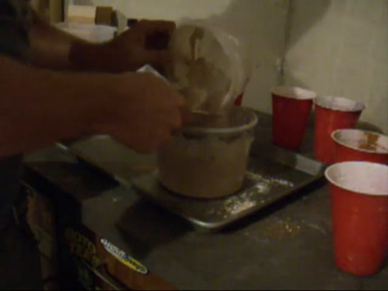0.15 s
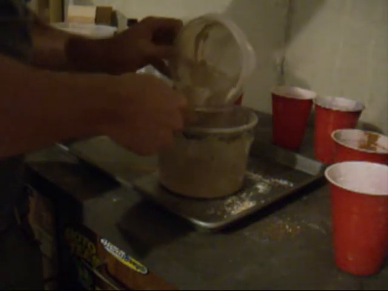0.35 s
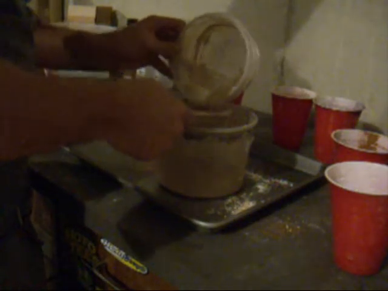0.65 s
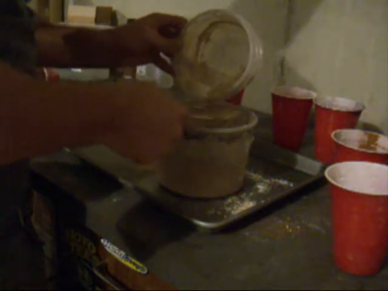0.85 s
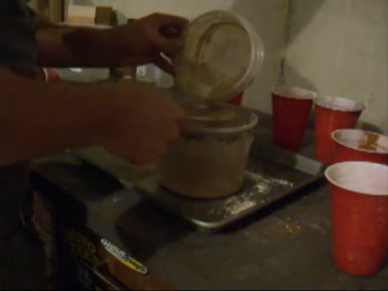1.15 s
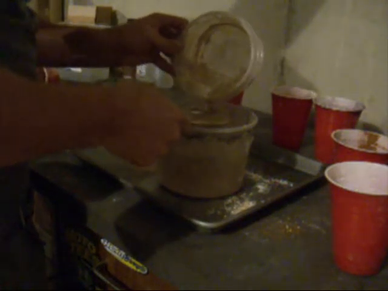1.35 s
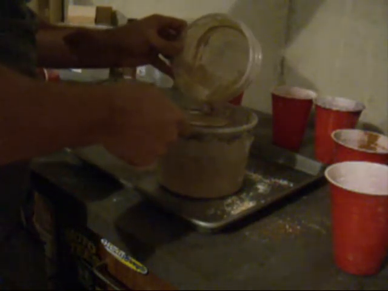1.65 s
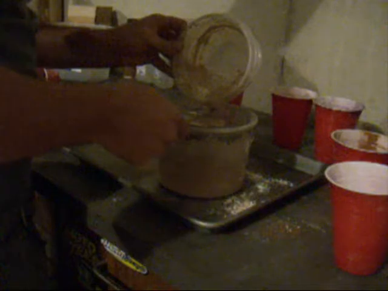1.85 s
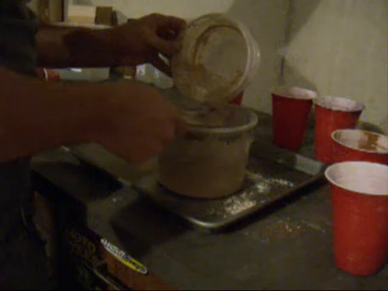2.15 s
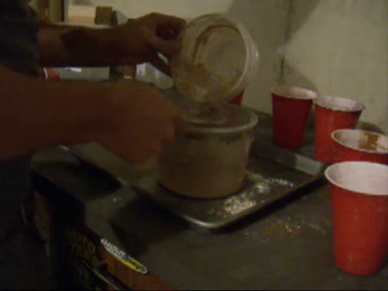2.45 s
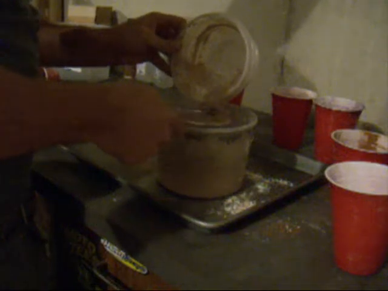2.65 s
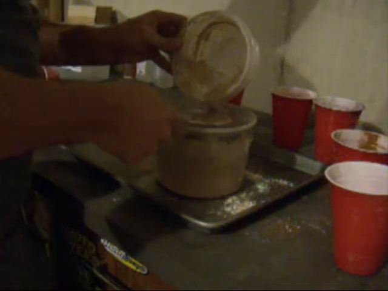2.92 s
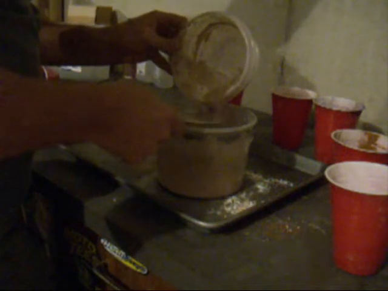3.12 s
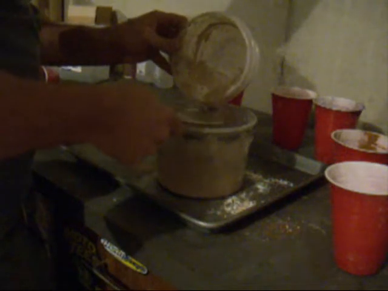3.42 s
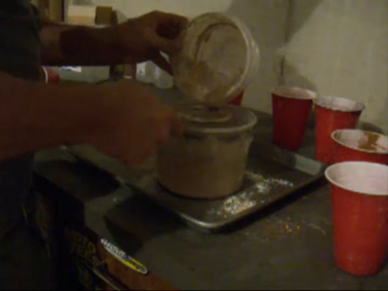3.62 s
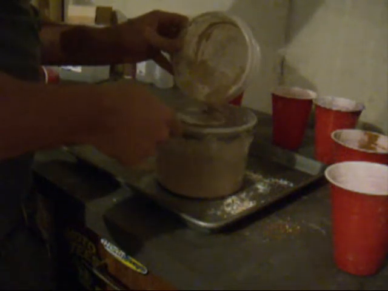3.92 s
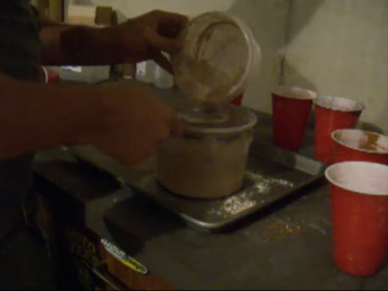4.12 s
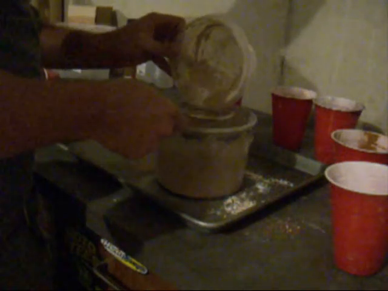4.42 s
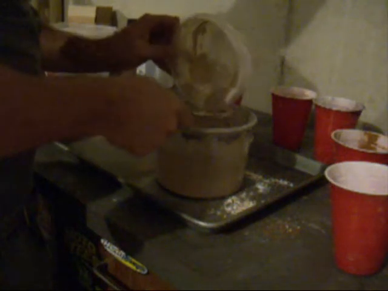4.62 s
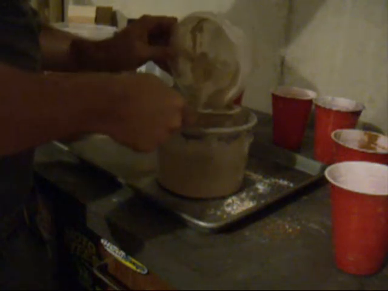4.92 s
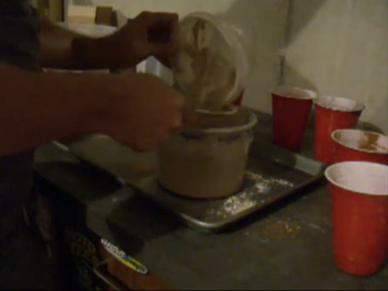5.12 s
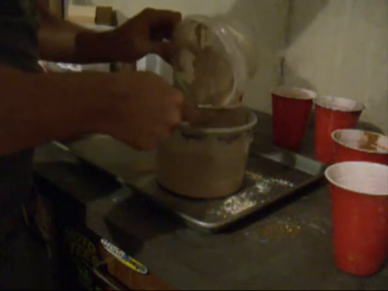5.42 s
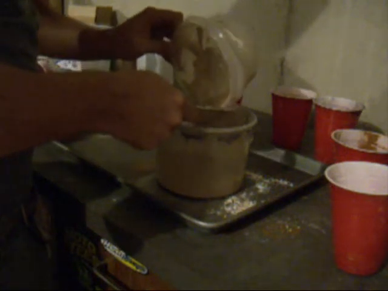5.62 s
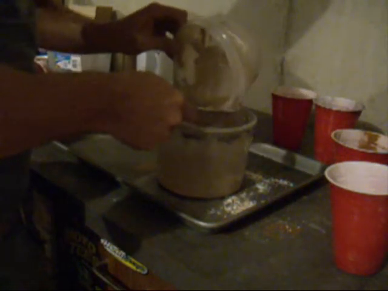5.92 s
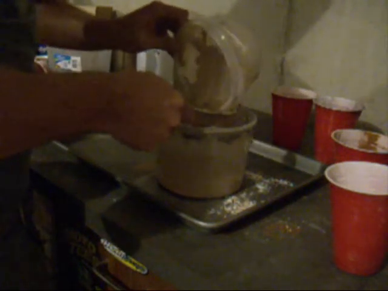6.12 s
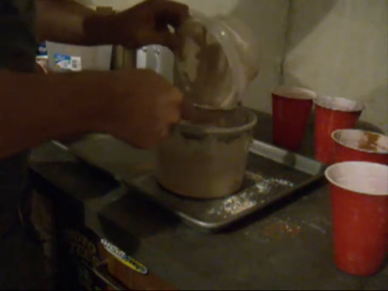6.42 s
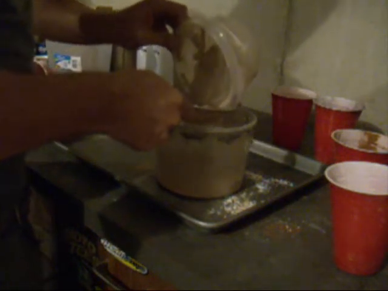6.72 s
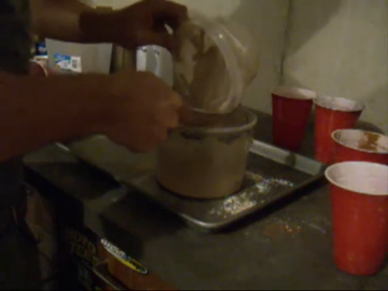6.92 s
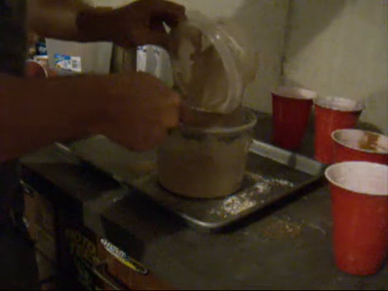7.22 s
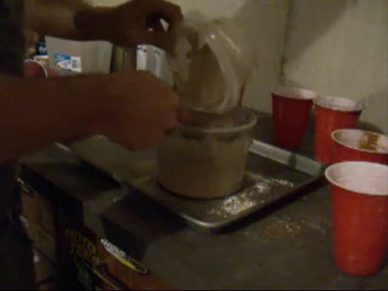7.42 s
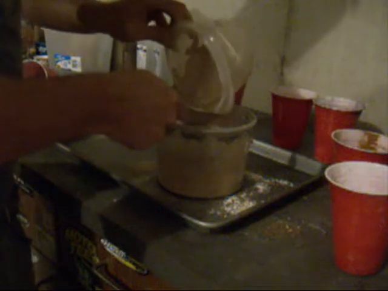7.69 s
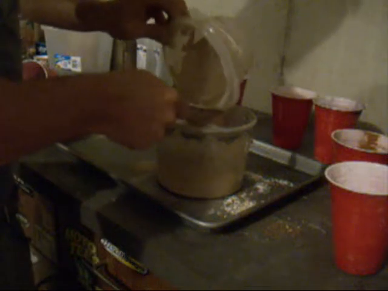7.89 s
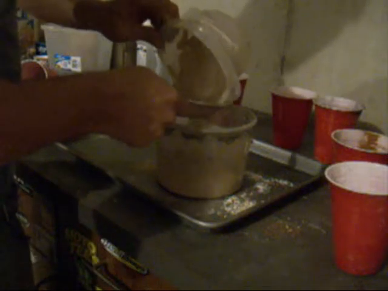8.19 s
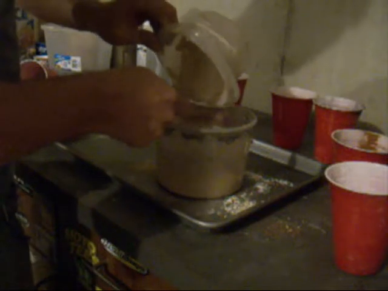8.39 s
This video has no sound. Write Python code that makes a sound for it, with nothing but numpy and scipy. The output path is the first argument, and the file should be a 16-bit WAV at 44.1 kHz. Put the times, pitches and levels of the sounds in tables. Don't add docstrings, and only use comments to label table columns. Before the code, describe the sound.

A small, close microphone in a bare, hard-walled room gives steady low rumble, soft hiss and two barely audible high whistles. From 0 to 0.5 s, a few faint strainer knocks and ticks come with a light powder swish, then quiet. At 1.7 s dull, soft pats on a plastic tub begin; from 2.1 s harder rim taps join, hollow, dry and short. The strongest cluster falls at 2.65-2.95 s, with more sharp taps at 3.35 and 3.5 s. Softer pats continue to 4.0 s, while a thin airy dust hiss swells around 3.65 s and fades. From 4.5 s light wire ticks and gritty swishes return, with a longer rasp near 5.6 s. Frame knocks gather from 6.4 s, stronger at 7.3 and 7.7 s, loudest at 8.1 s amid thick sandy rasping, with further knocks at 8.3 and 8.45 s before the end at about 8.6 s.

```python
import sys
import numpy as np
from scipy import signal
from scipy.fft import rfft, irfft, next_fast_len
from scipy.io import wavfile

SR = 44100
rng = np.random.default_rng(int(sys.argv[2]) if len(sys.argv) > 2 else 0)


def voltage_ratio(decibels):
    exponent = np.asarray(decibels, float) / 20
    return 10 ** exponent


def store_wav(level_fs):
    pcm = np.round(np.clip(np.atleast_2d(level_fs), -1, 1) * 32767)
    wavfile.write(sys.argv[1], SR, pcm.T.astype(np.int16))


N = 377055

# (frequency [Hz], decay time t60 [s])
ROOM_T60 = [(100, 0.82), (300, 0.64), (600, 0.47), (1500, 0.52), (4000, 0.52), (10000, 0.21)]


def tub_blow_levels(rows, hollow_db, clack_db):
    s, body, rim, sharp = np.transpose(rows)
    knock, tick = body + rim, body + sharp
    snap = tick - 3.5
    return np.transpose([s, body, body + hollow_db, knock, knock + clack_db, tick, snap])


def tap_blows():
    # (time [s], strength [dB], rim over body [dB], sharpness [dB])
    taps = [
        (2.094, -39.5, -4, -32),
        (2.655, -28, -4, -18.5),
        (2.79, -27, -2.5, -17),
        (2.8159, -34, -19, -18),
        (2.933, -29, -3.5, -24.5),
        (3.224, -44, 2.5, -18),
        (3.354, -30.5, 0, -16),
        (3.496, -28, -5.5, -25),
    ]
    return tub_blow_levels(taps, hollow_db=-7, clack_db=-3.5)


def pat_blows():
    # (time [s], strength [dB], rim over body [dB], sharpness [dB])
    pats = [(1.678, -39, -14.5, -25), (1.8, -37.5, -18, -31), (2.046, -34.5, -7.5, -30),
            (2.337, -33, -11, -26.5), (2.493, -36, -6, -24), (2.758, -37, -6, -23),
            (3.0495, -32, -14.5, -27), (3.217, -38, -22, -27), (3.333, -31, -15, -27),
            (3.603, -29.5, -6, -23), (3.769, -38, -20, -31), (3.89, -33.5, -12, -29),
            (4.016, -29.5, -5.5, -27)]
    return tub_blow_levels(pats, hollow_db=0, clack_db=-3)


def shake_blows():
    # (time [s], strength [dB], rim over body [dB], wire over body [dB])
    frame_knocks = [(0.041, -40, -12, -8.5), (0.1831, -47.5, -6.5, 3.5), (0.3076, -46.5, -12, -9),
                    (0.459, -42.5, -10.5, -3.5), (4.743, -49, 3, 5.5), (5.876, -48.5, -7, 0.5),
                    (6.228, -54.5, -11, 8), (6.435, -35, -5.5, -3.5), (6.82, -49.5, -23, 1.5),
                    (6.935, -50.5, -5, 6), (7.316, -34.5, -9, -3.5), (7.386, -43, -2, -7),
                    (7.51, -41.5, -1, -11), (7.693, -31.5, -10, -12), (7.73, -45, -3, -28),
                    (7.839, -45, 1.5, -3.5), (7.888, -44.5, 3.5, -2.5), (7.926, -45.5, 2, 0.5),
                    (8.013, -46.5, 0, -6), (8.1015, -26.5, -7, -6.5), (8.225, -38.5, -2.5, -9.5),
                    (8.3145, -35.5, 0, -13.5), (8.453, -31.5, -7.5, -15.5), (8.523, -44, -14, -14)]
    # (time [s], strength [dB], sharpness [dB])
    wire_ticks = [(0.024, -55, 2), (0.108, -49, -19), (0.47, -41.5, -27), (4.511, -61, -1),
                  (4.576, -49, -11), (5.019, -56, -4), (5.061, -71, 7), (5.096, -64, -4),
                  (5.3866, -48.5, -9), (5.5101, -44.5, -10), (5.532, -70, -1), (5.574, -54, -3),
                  (5.699, -55.5, -4), (5.751, -56, -2), (5.918, -53, -4), (6.021, -58, 0),
                  (6.056, -45, -15), (6.129, -52.5, -11), (6.395, -49, -10), (6.571, -44, -14),
                  (6.606, -57, -5), (6.707, -44.5, -11.5), (6.791, -70, 11), (6.842, -52, -9),
                  (6.974, -51, -6), (7.046, -50, -7), (7.073, -70.5, 18.5), (7.113, -77, 4),
                  (7.247, -52, -17), (7.673, -54.5, 1)]
    s, body, rim, wire = np.transpose(frame_knocks)
    clack = body + wire
    knocks = [s, body, body + rim / 2 - 0.5, body + rim, clack, clack - 8, clack - 16]
    s, clack, sharp = np.transpose(wire_ticks)
    tick = clack + sharp
    ticks = [s, clack - 11.5, clack - 16.5, clack - 16.5, clack, tick, tick - 3.5]
    return np.hstack([knocks, ticks]).T


def click_train(blows, hz, extra_db):
    blow_hz = [450, 760, 1300, 2800, 5600, 11000]
    weights = [np.interp(np.log(hz), np.log(blow_hz), unit) for unit in np.eye(len(blow_hz))]
    clicks = np.zeros(N)
    at = np.round((blows[:, 0] + 0.0008) * SR).astype(int)
    clicks[at] = voltage_ratio(blows[:, 1:] @ weights + extra_db)
    return clicks


def ring(clicks, hz, t60):
    r = voltage_ratio(-60 / (t60 * SR))
    w = 2 * np.pi * hz / SR
    return signal.lfilter([0, np.sin(w)], [1, -2 * r * np.cos(w), r * r], clicks + 1e-18)


def fading(clicks, t60):
    return signal.lfilter([1], [1, -voltage_ratio(-60 / (t60 * SR))], clicks + 1e-18)


def struck(blows, modes, gain_db, scatter_db):
    spot = rng.standard_normal((len(blows), len(modes)))
    out = np.zeros(N)
    for k, (hz, db, t60) in enumerate(modes):
        clicks = click_train(blows, hz, db + gain_db + scatter_db * spot[:, k])
        out += ring(clicks, hz, t60)
    return out


def radiated(body, contact_s, low_hz):
    t = np.arange(64) / SR
    push = np.sin(np.pi * np.clip(t / contact_s, 0, 1)) ** 2
    soft = signal.lfilter(push / push.sum(), [1], body)
    return signal.sosfilt(signal.butter(3, low_hz, "high", fs=SR, output="sos"), soft)


def tapped_tub():
    # (frequency [Hz], level [dB], decay time t60 [s])
    tub_modes = [(124, -2, 0.093), (209, -37, 0.091), (334, -15, 0.14), (450, -23.5, 0.062),
                 (545, 1.5, .085), (590, 2.5, 0.07), (694, -4, 0.068), (786, -2.5, 0.042), (1200, 6, 0.012),
                 (1400, 8, .013), (1700, -7, 0.037), (2140, -5, 0.02), (2640, -1, .035), (2730, 0, .04)]
    body = struck(tap_blows(), tub_modes, gain_db=4.0, scatter_db=3.0)
    return -radiated(body, contact_s=0.0003, low_hz=218)


def patted_wall():
    # (frequency [Hz], level [dB], decay time t60 [s])
    wall_modes = [(207, -22.5, 0.055), (324, -13, 0.14), (480, -11.5, 0.026), (570, -0.5, 0.045),
                  (694, 2, 0.04), (780, 2.5, 0.024), (1020, -1, 0.042), (1500, 9.5, 0.013),
                  (1920, -10, 0.013), (2700, -25, .015)]
    body = struck(pat_blows(), wall_modes, gain_db=1.5, scatter_db=4.5)
    return radiated(body, contact_s=0.00051, low_hz=201)


def shaken_strainer():
    # (frequency [Hz], level [dB], decay time t60 [s])
    strainer_modes = [(235, -13.5, 0.057), (353.7, 4, 0.036), (530, 1, 0.042), (734, -25, 0.01),
                      (832.4, -11, 0.2), (897, -13, 0.25), (926, -14, 0.39), (979, -10, 0.17),
                      (1202, -4, 0.043), (2076, 0, 0.023), (2663, 2, 0.018), (3087, 5.5, 0.0098),
                      (4680, 1.5, 0.039), (5125, 3.5, 0.034)]
    body = struck(shake_blows(), strainer_modes, gain_db=1.0, scatter_db=3.5)
    return radiated(body, contact_s=0.00011, low_hz=193)


def crack(blows, gain_db, wash_db):
    # (frequency [Hz], level [dB])
    crack_colour = [(155, -22.5), (470, -4), (800, -6.5), (1310, -3.5), (3050, -5), (6100, 0), (15000, 1)]
    # (frequency [Hz], decay time t60 [s])
    crack_t60 = [(310, 0.028), (1320, 0.027), (4000, 0.033), (14000, 0.015)]
    white, out = rng.standard_normal((2, N)), np.zeros(N)
    edges = 130 * 2 ** np.arange(0, 7.1, 0.5)
    for k, (low, high) in enumerate(zip(edges, edges[1:])):
        hz = np.sqrt(low * high)
        clicks = click_train(blows, hz, at_hz(crack_colour, hz) + gain_db)
        burst = fading(clicks, at_hz(crack_t60, hz))
        wash = fading(clicks, at_hz(ROOM_T60, hz)) - burst
        gate = burst + voltage_ratio(wash_db) * wash
        band_pass = signal.butter(2, [low, high], "band", fs=SR, output="sos")
        band = signal.sosfilt(band_pass, gate * white[k % 2])
        out += band * np.sqrt(SR / 2 / (high - low))
    return out


def grains(per_s, spectrum, cycles, clump_db):
    r = np.exp(-2 * np.pi * 35 / SR)
    clump = rms_one(signal.lfilter([1], [1, -2 * r, r * r], rng.standard_normal(N)))
    size_db = 2.8 * np.minimum(rng.exponential(1, N), 5) + clump_db * clump
    sizes = voltage_ratio(size_db) * rng.choice([-1, 1], N)
    clicks = sizes * (rng.random(N) < per_s / SR)
    pitches = np.geomspace(spectrum[0][0], spectrum[-1][0], num=16)
    dealt = rng.integers(0, 16, N)
    out = np.zeros(N)
    for k, hz in enumerate(pitches):
        out += voltage_ratio(at_hz(spectrum, hz)) * np.sqrt(hz) * ring(clicks * (dealt == k), hz, cycles / hz)
    return rms_one(out)


def powder():
    # (frequency [Hz], level [dB])
    rasp_colour = [(300, -29), (900, 4), (1500, -10), (2100, 7.5), (3100, 6), (4200, -11), (6000, -23)]
    # (frequency [Hz], level [dB])
    dust_colour = [(3500, -33), (4500, 1), (5200, 7.5), (6000, 5), (7200, -1), (9000, -4.5), (12500, 0.5),
                   (15300, -3)]
    # (time [s], level [dB])
    trickle_levels = [(0, -56), (.45, -82), (1.46, -63.5), (1.8, -76), (4.4, -76), (5.03, -68), (5.3, -84),
                      (5.8, -86), (6.3, -59.5), (6.7, -58), (7, -58.5), (7.28, -57.5), (7.6, -63),
                      (7.84, -51.5), (8.09, -48), (8.2, -51.5), (8.43, -59), (8.55, -62)]
    # (peak time [s], rasp level [dB], swell time [s], dust over rasp [dB])
    swishes = [(0.001, -52, .03, 1), (0.128, -53, 0.063, -12), (1.66, -52.5, 0.022, -18),
               (2.793, -36, .003, -15), (4.584, -48.5, 0.013, -3), (5.624, -44.5, 0.062, 1.8),
               (5.944, -48, 0.11, -3.5), (6.433, -42, 0.054, -4), (7.358, -47, 0.021, 0),
               (7.698, -47, .04, -13), (8.096, -65, 0.17, -1.5), (8.459, -55.5, 0.027, 9)]
    swell_db, swish_t60_s = 17.5, 0.14
    t, shakes, throws = np.arange(N) / SR, shake_blows(), np.zeros(N)
    throws[(shakes[:, 0] * SR).astype(int)] = voltage_ratio(-57.5 + 0.33 * (shakes[:, 4] + 37))
    spatter = fading(fading(throws, 0.053), 0.03) / 150
    jolts = fading(throws, 0.18) + voltage_ratio(7) * spatter
    trickle = voltage_ratio(np.interp(t, *np.transpose(trickle_levels)))
    rasp = jolts + trickle
    dust = voltage_ratio(-15.5) * jolts + voltage_ratio(-4) * trickle
    for s, db, swell_s, dust_db in swishes:
        times = [s - 3 * swell_s, s, s + swish_t60_s]
        swish = voltage_ratio(db + np.interp(t, times, [-3 * swell_db, 0, -60], right=-200))
        rasp = rasp + swish
        dust = dust + voltage_ratio(dust_db) * swish
    coarse = grains(3500, rasp_colour, cycles=10, clump_db=4.2)
    fine = grains(9000, dust_colour, cycles=9, clump_db=4)
    return voltage_ratio(-3.5) * rasp * coarse + voltage_ratio(-5.5) * dust * fine


def puff():
    # (time [s], level [dB])
    air_levels = [(3.55, -85), (3.65, -67), (4.05, -70), (4.4, -85)]
    # (frequency [Hz], level [dB])
    air_colour = [(7000, -20), (8300, 7), (9800, 1), (11000, -12), (13500, -0.5), (14500, -15)]

    def colour_db(hz):
        return np.where((hz > 7000) & (hz < 14500), at_hz(air_colour, hz), -60)

    noise = rms_one(coloured(rng.standard_normal(N), colour_db))
    return noise * voltage_ratio(np.interp(np.arange(N) / SR, *np.transpose(air_levels), left=-200, right=-200))


def room(x, tail_db):
    # (delay [s], level [dB])
    echoes = [(.0045, -28.5), (.011, -12), (0.018, -12.5), (0.028, -25)]
    t = np.arange(SR // 2) / SR
    white, reply = rng.standard_normal((2, len(t))), np.zeros(len(t))
    edges = 70 * 2 ** np.arange(0, 8.1, 0.5)
    for k, (low, high) in enumerate(zip(edges, edges[1:])):
        band_pass = signal.butter(2, [low, high], "band", fs=SR, output="sos")
        band = signal.sosfilt(band_pass, white[k % 2])
        reply += band * voltage_ratio(-60 * t / at_hz(ROOM_T60, np.sqrt(low * high)))
    reply *= voltage_ratio(tail_db) * (1 - np.exp(-t / 0.009))
    reply[0] = 1
    for s, db in echoes:
        reply[round(s * SR)] += voltage_ratio(db)
    return signal.fftconvolve(x, reply)[:N]


def background():
    # (frequency [Hz], level per Hz [dB])
    hiss_colour = [(16, -0.5), (35, 4), (155, 0), (310, -3), (610, -6.5), (1020, -10.5), (1650, -13),
                   (4100, -18), (6400, -20.5), (9100, -19), (10800, -25.5), (13100, -21.5), (15450, -24.5)]
    # (frequency [Hz], level [dB])
    whistles = [(10646, -80), (11404, -80)]
    noise = coloured(rng.standard_normal(N), lambda hz: at_hz(hiss_colour, hz))
    out = voltage_ratio(-54.5) * rms_one(noise)
    t = np.arange(N) / SR
    for hz, db in whistles:
        out += np.sqrt(2) * voltage_ratio(db) * np.sin(2 * np.pi * hz * t)
    return out


def response_db(hz):
    # (frequency [Hz], width [Hz], depth [dB])
    notches = [(5760, 45, 9), (7880, 100, 10), (14200, 90, 12)]
    dips = sum(db * np.exp(-np.abs(hz - at) / width) for at, width, db in notches)
    shelf = 24 * np.clip((hz - 15430) / 150, 0, 1) + 40 * (hz > 16500)
    return -dips - shelf


def at_hz(points, hz):
    return np.interp(np.log(hz), np.log(np.array(points)[:, 0]), np.array(points)[:, 1])


def rms_one(x):
    return x / np.sqrt(np.mean(x ** 2) + 1e-20)


def coloured(x, gain_db):
    size = next_fast_len(len(x))
    hz = np.maximum(np.fft.rfftfreq(size, 1 / SR), 1)
    return irfft(rfft(x, size) * voltage_ratio(gain_db(hz)), size)[:len(x)]


def scene():
    sources = tapped_tub() + patted_wall() + shaken_strainer() + powder()
    all_blows = np.vstack([tap_blows(), pat_blows(), shake_blows()])
    rattle = crack(all_blows, gain_db=2.5, wash_db=-13.5)
    return (room(sources, tail_db=-36.0) + rattle + background() + puff())[None]


def band_limit(x):
    return signal.sosfilt(signal.butter(12, 16460, fs=SR, output="sos"), x)


def record(dry):
    mix = coloured(dry[0], response_db)[None]
    return band_limit(mix)


dry = scene()
out = record(dry)
store_wav(out)
```